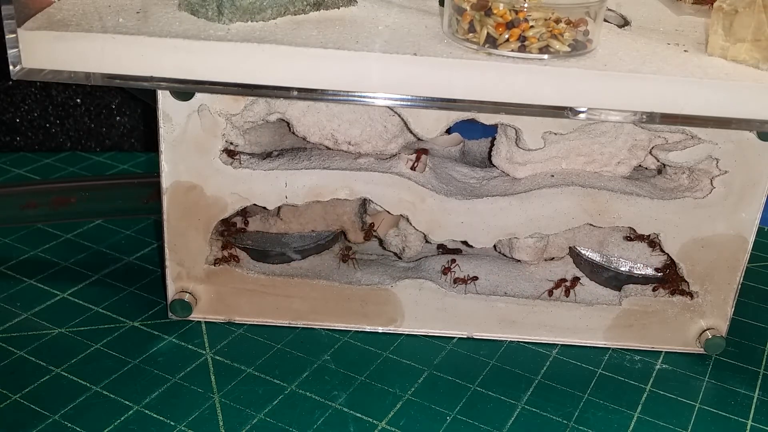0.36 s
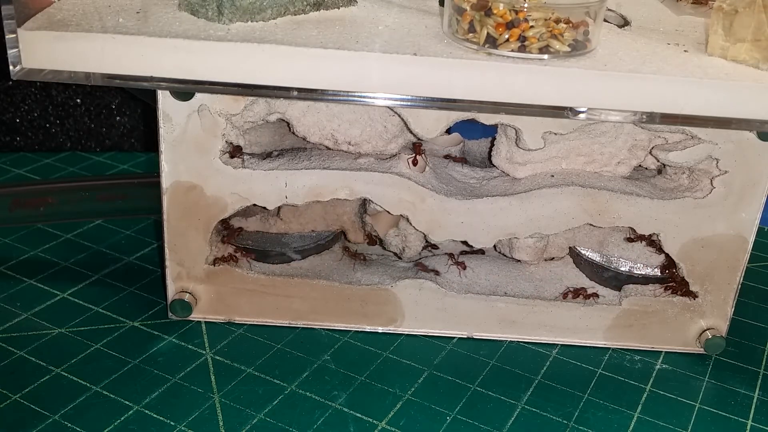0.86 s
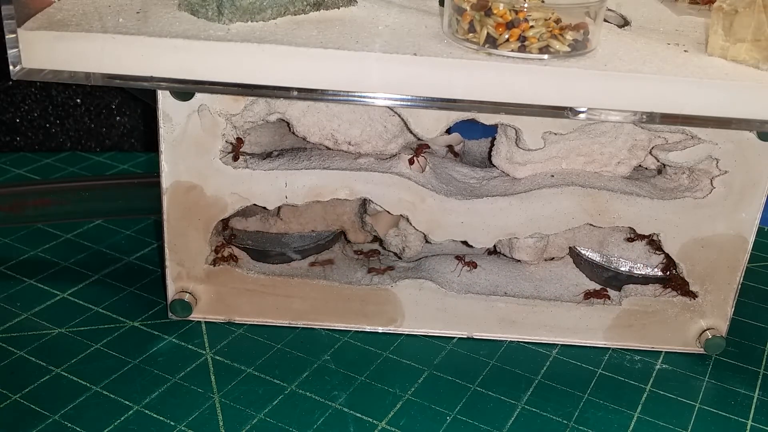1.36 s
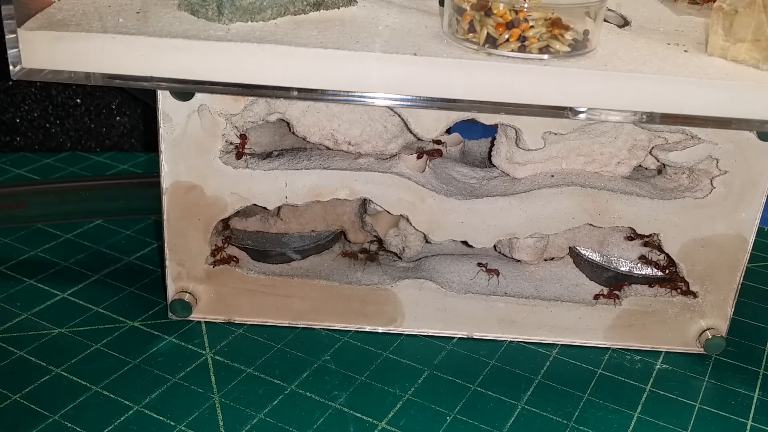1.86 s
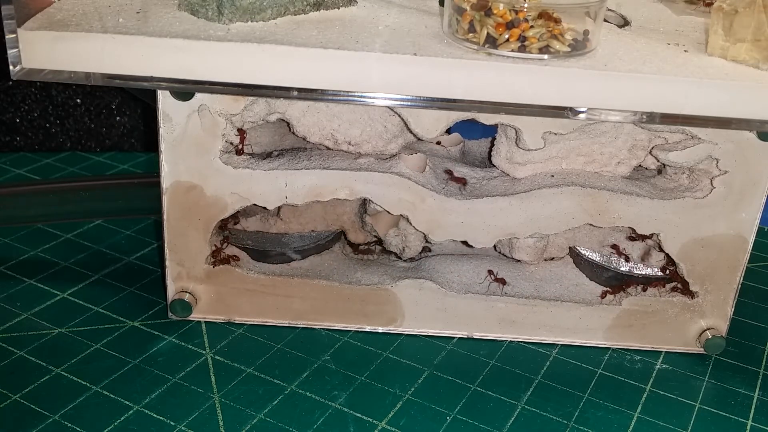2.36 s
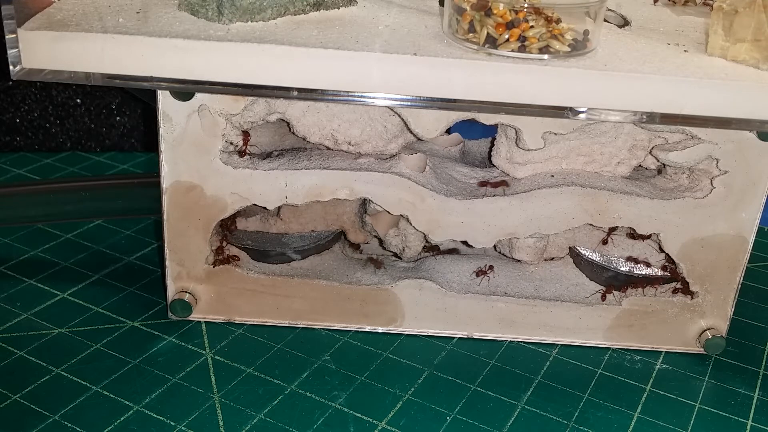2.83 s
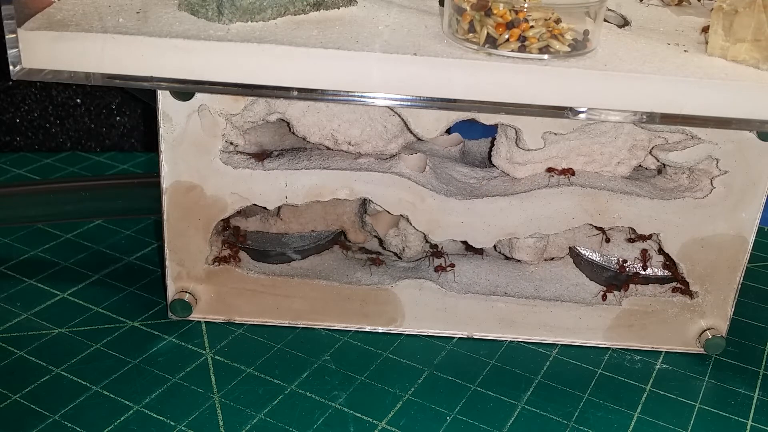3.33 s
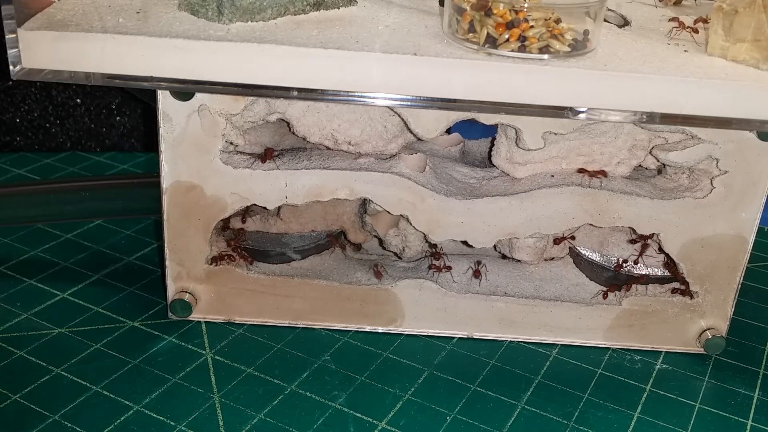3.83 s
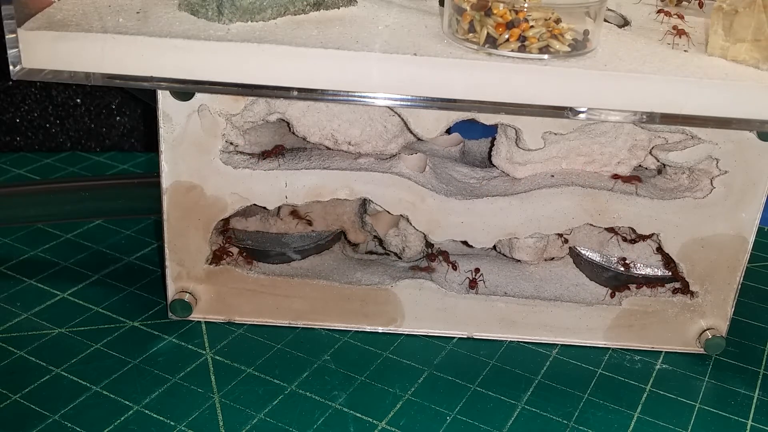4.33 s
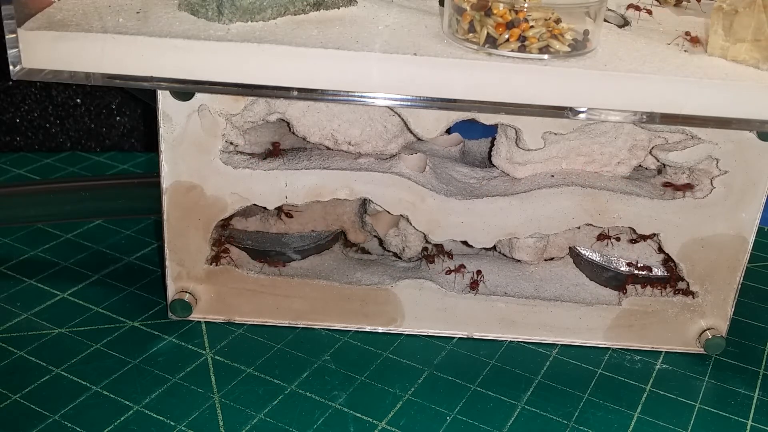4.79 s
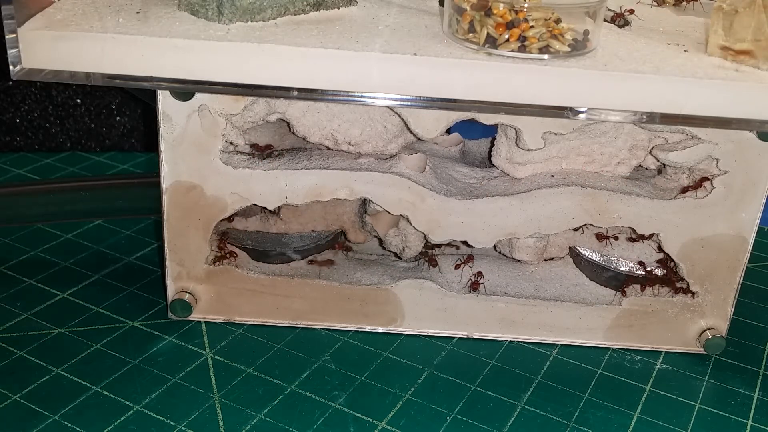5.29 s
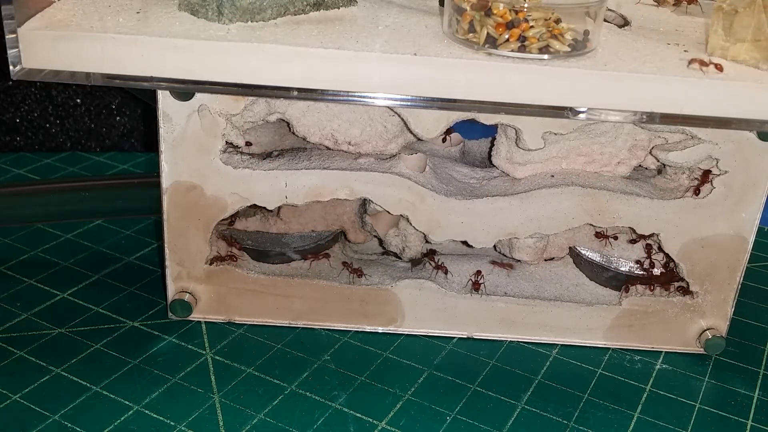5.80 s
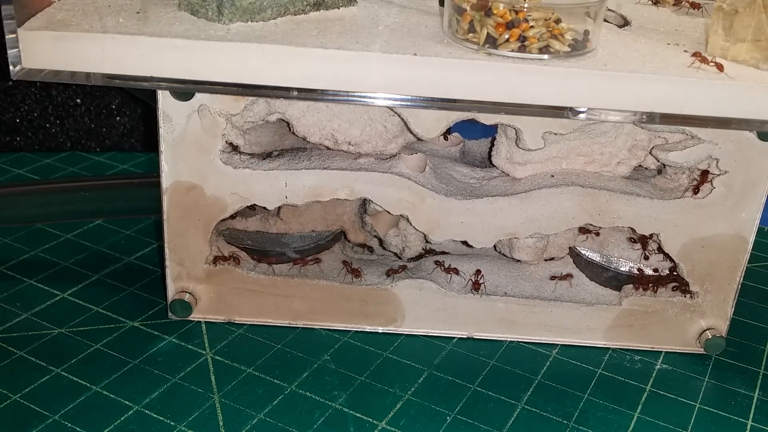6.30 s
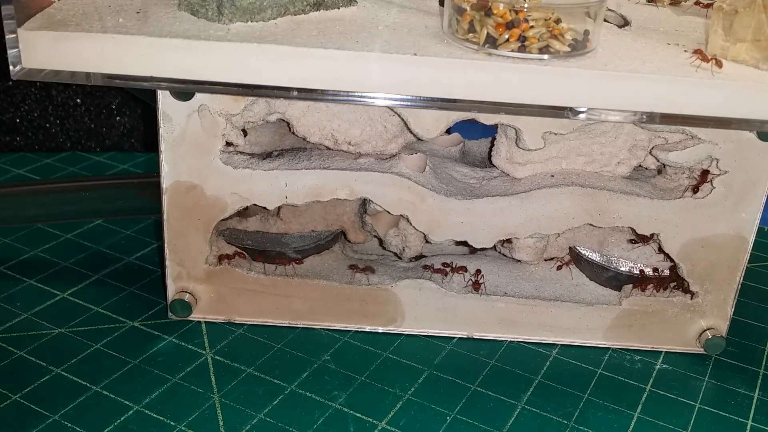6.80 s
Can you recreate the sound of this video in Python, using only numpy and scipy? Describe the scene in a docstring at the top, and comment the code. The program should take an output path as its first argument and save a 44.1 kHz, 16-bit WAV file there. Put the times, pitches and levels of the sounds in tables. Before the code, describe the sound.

A quiet indoor room, closely miked in stereo: a low wavering appliance hum, soft air rush, a thin motor whine and faint high hiss, with a very faint flickering high band on the left. Steel tweezers click at the very start, with tiny ticks and slides until about 0.7 s, nearer the right. After a gap, brighter short pings and scratches come at 1.75-1.9 s, 2.2-2.3 s and 2.5-3.0 s, the last cluster drier and tickier; sparse faint ticks continue to 3.85 s. Then mostly room tone, with one faint small knock on the right at 4.4 s. At 5.76 and 5.92 s two sharp taps strike the hollow lid, by far the loudest events, each with a hard crack, tiny rebound and short woody-metallic ring fading into the room within half a second. At 6.57 s a quick metallic click and scrape rattles briefly, then only the hum and hiss remain to about 7 s.

```python
"""A quiet room: steel tweezers scrape and click lightly on a small box nearer the right microphone, then tap its lid.
The prongs ring as damped sines with gated contact noise; the hollow lid rings in many modes after two taps.
One faint knock falls between. Contacts, taps and knock are echoed by decaying noise shaped like the room.
A far appliance hums as narrow noise and steady sines under rushing air.
Coloured noise hisses on both sides; apart from it, a faint band near 12.5 kHz on the left goes on and off."""
import sys
import numpy as np
from scipy import signal
from scipy.fft import rfft, irfft, next_fast_len
from scipy.io import wavfile
from scipy.ndimage import uniform_filter1d

SR = 44100
rng = np.random.default_rng(int(sys.argv[2]) if len(sys.argv) > 2 else 0)


def makeup_ratio(level_db):
    """Linear amplitude ratio for a level in decibels (20 dB per factor of ten)."""
    decades = np.asarray(level_db, float) / 20
    return 10 ** decades


def unload_wav(signal):
    """Save mono or channel-first audio to the path in sys.argv[1] as 16-bit WAV at rate SR, clipped to [-1, 1]."""
    wavfile.write(
        sys.argv[1],
        SR,
        np.round(np.clip(np.atleast_2d(signal).T, -1, 1) * 32767).astype(np.int16),
    )


N = 315315
TIME = np.arange(N) / SR


def unit(x):
    """Scale to rms 1."""
    return x / np.sqrt(np.mean(x ** 2))


def along(points, hz):
    """Read (freq_hz, value) points on a log frequency axis."""
    f, v = np.transpose(points)
    return np.interp(np.log(hz + 1), np.log(f + 1), v)


def noise(gain, channels=1):
    """White noise coloured by a gain per root Hz."""
    m = next_fast_len(N)
    white = rfft(rng.standard_normal((channels, m))) * np.sqrt(SR / 2)
    return irfft(white * gain(np.fft.rfftfreq(m, 1 / SR)), m)[:, :N]


def coloured(points):
    """Gain of a (freq_hz, level_db) table, silent beyond its top and under half its lowest frequency."""
    return lambda hz: makeup_ratio(along(points, hz)) * (hz > points[0][0] / 2) * (hz < points[-1][0])


def fade(t, t60):
    """Exponential decay, 60 dB in t60 seconds."""
    return makeup_ratio(-60 * t / t60)


def swell(t, rise, t60):
    """Exponential rise (time constant in s) then decay, peak 1."""
    shape = (1 - np.exp(-t / max(rise, 1 / SR))) * fade(t, t60)
    return shape / shape.max()


def add(out, s, piece):
    """Mix a piece in at time s, cut at the end."""
    room_left = out[..., round(s * SR):][..., :piece.shape[-1]]
    room_left += piece[..., :room_left.shape[-1]]


def sides(db):
    """Left and right gains for a left-right difference."""
    return makeup_ratio(np.array([[db / 2], [-db / 2]]))


# contact noise, left over right: freq_hz, left_right_db
CONTACT_BALANCE = [(1500, 0.5), (2800, 1.5), (4500, 0.5), (9000, -5), (14000, -4)]


def stereo_noise(points):
    """Unrelated contact noise in both microphones, rms 1 on the right."""
    def gain(hz):
        left_right = [makeup_ratio(along(CONTACT_BALANCE, hz)), 1 + 0 * hz]
        return coloured(points)(hz) * left_right

    pair = noise(gain, channels=2)
    return pair / pair[1].std()


# clear contacts, nominal levels on the right: start_s, ring_db, lower_ring_db, scratch_db, tick_db
CLICKS = [(0.008, -36, -54, -60, -60), (0.198, -54.5, -63, -74, -68), (0.262, -51, -59, -66, -69),
          (0.29, -59, -53, -68, -67), (0.309, -50, -52, -62, -66), (0.33, -55, -57, -65, -62),
          (0.589, -47, -46.5, -62, -66), (0.639, -54, -43, -74, -63), (0.714, -51, -60, -64, -65),
          (1.747, -33.5, -53, -49, -37), (1.851, -41, -62, -51, -42.5), (1.861, -46, -55, -50, -52),
          (1.878, -48, -60, -55, -51), (1.891, -39, -44, -49.5, -38), (2.199, -26, -37, -43.5, -48),
          (2.245, -51, -55, -66, -64), (2.306, -32, -45, -41.5, -39), (2.312, -37.5, -41, -49, -53),
          (2.515, -38.5, -44.5, -54, -53), (2.545, -48, -60, -58, -64), (2.58, -53, -64, -61, -68),
          (2.714, -49, -57, -73, -67), (2.745, -47, -51, -59, -51), (2.768, -30.5, -34, -45.5, -45),
          (2.774, -30, -37, -49, -44.5), (2.803, -54, -59, -55, -44), (2.824, -68, -63, -60, -51),
          (2.838, -50, -68, -57, -36.5), (2.853, -45, -57, -49.5, -36), (2.902, -43, -64, -49.5, -41.5),
          (2.963, -45, -60, -47, -32.5), (2.969, -49, -58, -55, -36), (2.978, -41, -67, -68, -48),
          (2.983, -58, -63, -49, -42), (3.285, -49, -58, -55.5, -43.5), (3.494, -51.5, -70, -62, -50),
          (3.735, -55, -63, -59, -50), (3.773, -56, -68, -54, -49), (3.831, -66, -70, -50.5, -38),
          (3.841, -66, -67, -55.5, -43), (6.572, -28, -27.5, -39.5, -33.5), (6.593, -50, -51, -50, -63),
          (6.603, -42, -43, -52, -58), (6.611, -36, -34.5, -41.5, -40), (6.62, -36, -47, -50, -39.5),
          (6.627, -40, -45, -52, -55)]
SNAGS_PER_S, SNAG_SPREAD_DB = 18, 2
# mean levels of chance snags: ring_db, lower_ring_db, scratch_db, tick_db
SNAG_DB = (-59.5, -63.5, -62.5, -67)


def contacts():
    """Clear contacts, each with the time of the next, then chance snags along every slide."""
    stops = [row[0] for row in CLICKS[1:]] + [np.inf]
    rows = [(*row, stop) for row, stop in zip(CLICKS, stops)]
    for s, length, _ in RUBS:
        place, size = rng.random(8), rng.standard_normal((8, 4))
        count = int(np.ceil(SNAGS_PER_S * length))
        for k in range(count):
            snag_s = s + length * (k + place[k]) / count
            levels_db = np.add(SNAG_DB, SNAG_SPREAD_DB * size[k])
            rows.append((snag_s, *levels_db, np.inf))
    return rows


# prong modes, t60 before damping: pitch_hz, level_re_ring_db, t60_s, left_right_db, left_lead_rad
PRONGS = [(1506, 0, 0.083, -9.5, 1.38), (1826, -15, 0.095, -1.5, 2.66), (2520, -20.5, 0.055, -4, 1.8)]
# box wall, driven by the dull scratch, capped 1 dB under the ring; same columns, level re that drive
WALL = [(648, -9, 0.42, 2.6, 1), (515, -10, 0.056, 2.6, .3)]
# relative colour of low scratch noise: freq_hz, level_db
DULL = [(1700, -33), (1900, -13), (2300, -8), (2700, 2.5), (3150, -3.5), (3600, -11.5), (4200, -34)]
# relative colour of higher scratch noise: freq_hz, level_db
SHARP = [(3100, -40), (3600, -9.5), (4200, -1), (4900, -4), (5800, -1.5), (6800, -34)]
# relative colour of the tick: freq_hz, level_db
TICK = [(5000, -34), (6200, 0), (7000, 10), (8800, 8.5), (10000, 7), (11500, 3.5), (15000, -3),
        (16500, -31)]
SHARPEN_DB_PER_DB = 0.086  # a contact that rings more than it ticks scratches sharper


def clicks():
    """Each contact rings prongs and wall, damped by grip and next touch, and gates scratches and a tick."""
    ring, gates, t = np.zeros((2, N)), np.zeros((3, N)), TIME[:SR // 5]
    rows = contacts()
    chance = rng.standard_normal((len(rows), 3))
    shapes = [swell(t, 0.00025, 0.05) + 0.99 * fade(t, 0.009),
              swell(t, 0.00098, 0.041) + 0.92 * fade(t, 0.0087),
              swell(t, 0.00012, 0.019) + 0.35 * fade(t, 0.095)]
    for (s, ring_db, lower_db, scratch_db, tick_db, stop), (pitch, grip, size) in zip(rows, chance):
        tilt_db = SHARPEN_DB_PER_DB * (ring_db - tick_db)
        dull, sharp = makeup_ratio(scratch_db - tilt_db), makeup_ratio(scratch_db + tilt_db)
        lower = (1310 + 55 * grip, lower_db - ring_db, .04, -7, 1.4)  # pitch depends on the grip
        next_touch = fade(np.maximum(t - (stop - s), 0), 0.029)
        damped = next_touch * np.exp(-(t / 0.019) ** 3)  # fingers close on the steel
        for hz, db, t60, side_db, lead in PRONGS + [lower] + WALL:
            drive = makeup_ratio(ring_db) if hz > 900 else min(dull, makeup_ratio(ring_db - 1))
            level = drive * makeup_ratio(db + side_db / 4 * size) * swell(t, 0.0019, t60) * damped
            swing = np.sin(2 * np.pi * hz * (1 + .008 * pitch) * t + [[lead], [0]])
            add(ring, s, level * makeup_ratio([[side_db], [0]]) * swing)
        peaks = np.array([[dull], [sharp], [makeup_ratio(tick_db)]])
        add(gates, s, makeup_ratio(-5.5) * peaks * shapes)
    slips = uniform_filter1d(rng.standard_normal(N), size=40)
    grit = unit(makeup_ratio(2.2 * unit(slips)))  # contact is a burst of tiny slips
    scratches = sum(gate * stereo_noise(colour) for gate, colour in zip(gates, (DULL, SHARP, TICK)))
    return ring + grit * scratches


# tips slide along the box; right level before end tapers: start_s, length_s, level_db_rms
RUBS = [(0.02, 0.097, -67), (.15, 0.21, -69), (.55, 0.12, -68), (1.848, 0.063, -54), (2.206, 0.06, -61),
        (2.305, 0.15, -64), (2.475, .12, -61), (2.74, 0.3, -66), (3.38, 0.19, -73), (3.73, 0.079, -66),
        (6.567, 0.082, -48)]
# relative colour of sliding: freq_hz, level_db
RUB = [(900, -19), (1150, 0), (1400, -17), (1530, 5.5), (1680, -9), (2000, -14), (3000, -15), (5000, -36),
       (9000, -24), (13000, -36), (15000, -60)]


def rubs():
    """Sliding keeps the prongs faintly and unevenly excited: noise peaked near their pitch."""
    gate = np.zeros(N)
    for s, length, db in RUBS:
        add(gate, s, makeup_ratio(db) * signal.windows.tukey(round(length * SR), .4))
    catches = makeup_ratio(4.0 * unit(uniform_filter1d(rng.standard_normal(N), size=500)))
    return gate * unit(catches) * stereo_noise(RUB)


# taps, rebound level re crack: start_s, crack_db, crack_t60_s, rebound_db
TAPS = [(5.7595, -19, 0.025, -6.5), (5.9232, -16.5, 0.03, -9)]
# lid modes, level before rise and decay: pitch_hz, t60_s, first_spot_db, second_spot_db, left_right_db
LID = [(113, .9, -46, -40, 3), (143, .42, -38, -29, 1), (286.6, .7, -45, -35, 4), (359, .25, -25, -35, -5),
       (465, .3, -29, -19, 0), (476, .25, -25, -14.5, 2), (520, .42, -33, -22, 4), (564.5, .3, -24, -13, 0),
       (617, .26, -34, -25, 5), (679.5, .25, -27, -18, 3), (727, .27, -40, -30, 4), (195, .1, -36, -30, 1),
       (320, .1, -38, -34, 0), (410, .1, -34, -28, 0), (853, .1, -45, -36, 6), (1150, .3, -38, -35, -4),
       (1360, .11, -38, -29, -6), (1428, .08, -34, -37, 8), (1545, .09, -44, -37, -5),
       (1755, .09, -44, -32, -8), (1965, .1, -34, -27, 6), (2150, .1, -42, -31, -5),
       (2396, .1, -44, -34, 6), (2612, .16, -43, -33, -4), (3213, .18, -47, -33, 2),
       (3850, .08, -40, -36, -5), (5010, .08, -45, -40, 7)]
# relative colour of the crack: freq_hz, level_db
CRACK = [(150, -21), (300, 9.5), (700, 9.5), (1000, 1.5), (1500, 4), (3000, 3), (5000, 1.5), (7000, 0.5),
         (10000, -12), (16000, -21.5)]
PHASE_OFFSET_S = 0.002355  # sets each mode's starting phase, which grows with its pitch
RISE_AT_500_HZ_S, REBOUND_S, RATTLE_DB = 0.0055, 0.0061, -30.5
LINGER_DB, LINGER_T60_S = -17, 0.27  # high modes fall fast at first, then ring on faintly


def taps():
    """Each tap rings the lid's long low modes and short high ones, cracks, rebounds once and rattles."""
    body, edge, gate, t = np.zeros((2, N)), np.zeros((2, N)), np.zeros(N), TIME[:SR]
    for spot, (s, crack_db, crack_t60, rebound_db) in enumerate(TAPS):
        for hz, t60, *level_db, side_db in LID:
            # high modes reach each ear differently
            apart_rad = rng.standard_normal((2, 1)) * np.clip(hz / 900 - .45, 0, 3)
            swing = np.sin(2 * np.pi * hz * (t + PHASE_OFFSET_S) + apart_rad)
            attack = 1 - np.exp(-t / RISE_AT_500_HZ_S * np.sqrt(hz / 500))
            dying = fade(t, t60) + (hz > 800) * makeup_ratio(LINGER_DB) * fade(t, LINGER_T60_S)
            mode = makeup_ratio(level_db[spot]) * sides(side_db) * attack * dying * swing
            add(body if hz < 800 else edge, s, mode)
        crack = makeup_ratio(crack_db) * swell(t, 0.00064, crack_t60)
        rattle = makeup_ratio(RATTLE_DB) * fade(t, 0.043)
        add(gate, s, crack + rattle)
        add(gate, s + REBOUND_S, makeup_ratio(crack_db + rebound_db) * swell(t, 0.0016, crack_t60))
    return body, edge + gate * unit(noise(coloured(CRACK), channels=2))


SHIMMER_COUNT, SHIMMER_DB_PER_OCT = 60, -2.5
SHIMMER_RE_CRACK_DB, SHIMMER_T60_S = -25.5, 0.29  # both at 1 kHz


def shimmer():
    """The lid's many weak high modes: the same pitches for every tap, new strengths each time."""
    out, t = np.zeros((2, N)), TIME[:SR // 2]
    octave = 2.7 * rng.random((SHIMMER_COUNT, 1))
    decay = fade(t, SHIMMER_T60_S / (1 + 0.49 * octave))
    for s, crack_db, *_ in TAPS:
        for ear in out:
            size, phase = rng.standard_normal((SHIMMER_COUNT, 1)), rng.random((SHIMMER_COUNT, 1))
            swing = np.sin(2 * np.pi * (1000 * 2 ** octave * t + phase))
            modes = makeup_ratio(SHIMMER_DB_PER_OCT * octave + 4.5 * size) * swing * decay
            add(ear, s, makeup_ratio(crack_db + SHIMMER_RE_CRACK_DB) * modes.sum(axis=0))
    return out


KNOCK_S = 4.407
# modes of one faint knock, level midway between sides: pitch_hz, level_db, t60_s
KNOCK = [(958, -53, .055), (1793, -56, .035), (420, -58, .03)]


def knock():
    """Something small knocks once, to the right: a few short damped modes."""
    out, t = np.zeros((2, N)), TIME[:SR // 5]
    for hz, db, t60 in KNOCK:
        add(out, KNOCK_S, makeup_ratio(db) * sides(-12) * swell(t, 0.0011, t60) * np.sin(2 * np.pi * hz * t))
    return out


# reverberation: freq_hz, t60_s
ROOM = [(300, 0.54), (1500, 0.59), (4000, 0.45), (8000, 0.26), (14000, 0.4)]


def room(x):
    """Each frequency of the room's answer dies at its own speed."""
    hz, t, z = signal.stft(rng.standard_normal((2, SR // 2)), SR, nperseg=256)
    decaying = z * fade(t, along(ROOM, hz)[:, None])
    tail = signal.istft(decaying, SR, nperseg=256)[1]
    return signal.fftconvolve(x, tail / np.linalg.norm(tail[0]), axes=1)[:, :N]


# left hiss colour, rescaled to HISS_DB: freq_hz, relative_db_per_hz
HISS_LEFT = [(1000, -112), (2500, -103), (4500, -101), (5500, -95), (6100, -85.5), (6600, -84), (7100, -91),
             (7900, -101), (9500, -104), (10900, -107), (13600, -104), (14500, -99.5), (15300, -95.5),
             (15600, -140)]
# right hiss: freq_hz, level_db_per_hz
HISS_RIGHT = [(800, -108), (2500, -105), (4500, -107), (6200, -111), (10000, -109), (15300, -106),
              (15600, -140)]
# faint on-off band on the left, on the scale of HISS_LEFT: freq_hz, relative_db_per_hz
FLICKER = [(10900, -115), (11500, -102), (12200, -94), (12800, -99.5), (13200, -88.5), (13600, -115)]
# spells with the on-off band almost silent: start_s, length_s
GAPS = [(0.094, 0.062), (0.232, 0.094), (0.531, 0.059), (0.646, 0.072), (1.089, 0.073), (1.376, 0.11),
        (2.432, 0.15), (2.703, 0.06), (3.052, 0.076), (3.186, 0.039), (3.367, 0.12), (3.743, 0.083),
        (4.276, 0.13), (4.442, 0.041), (4.719, 0.11), (5.168, 0.091), (5.368, 0.16), (5.95, 0.063),
        (6.13, 0.063), (6.285, 0.085), (6.973, 0.093)]
BLINKS_PER_S, BLINK_S = 2, .02  # short spells at chance times
HISS_DB, SURGE_DB, SURGE_S = -52.5, 4.5, 0.22  # left hiss rms; jump at each tap, time constant back


def hiss_and_flicker():
    """Hiss on both sides, plus a faint left band near 12.5 kHz going on and off; the left jumps at each tap."""
    present, surge_db = np.ones(N), np.zeros(N)
    blinks = [(s, BLINK_S) for s in rng.random(round(BLINKS_PER_S * N / SR)) * N / SR]
    for start, length in GAPS + blinks:
        present[(TIME > start) & (TIME < start + length)] = .05
    for s, *_ in TAPS:
        add(surge_db, s, SURGE_DB * np.exp(-TIME[:SR] / SURGE_S))
    flicker = uniform_filter1d(present, size=400) * noise(coloured(FLICKER))[0]
    steady = noise(coloured(HISS_LEFT))[0]
    left = (steady + flicker) / steady.std() * makeup_ratio(HISS_DB + surge_db)
    return np.array([left, noise(coloured(HISS_RIGHT))[0]])


# air rush: freq_hz, level_db_per_hz
AIR = [(30, -108), (45, -104), (60, -77), (160, -86), (210, -90.5), (300, -87), (520, -89.5), (620, -94.5),
       (1000, -99), (2000, -106), (5000, -118)]
# left-right correlation of the air: freq_hz, likeness
ALIKE = [(60, 1), (150, 0.76), (230, 0.81), (500, 0.76), (780, -0.55), (1200, 0.15), (1800, -0.33)]
# wavering room tones, rescaled by SWELL: pitch_hz, width_hz, relative_db_per_hz
BOOM = [(57.6, 11.4, -82.5), (81.9, 5.6, -73), (120.15, 2.56, -67), (124.74, 1.24, -64), (133.5, 13, -77.5),
        (141.9, 5.4, -73.5), (255.7, 6, -79), (390, 9.2, -86), (427, 3.7, -99.5), (532.8, 6.9, -84),
        (650, 2.2, -89.5)]
# room tone level, midway between sides: time_s, level_db_rms
SWELL = [(0, -54), (1.2, -56.5), (2.4, -54), (3, -57.5), (4.1, -51.5), (4.5, -52.5), (5.3, -56.5),
         (6, -54.5), (6.6, -57), (7.15, -54)]
# steady whine, level midway between sides: pitch_hz, level_db_rms, left_right_db
WHINE = [(763, -91, 25), (884, -99, -37), (965, -108.5, -28), (1068, -76.5, 0), (1180, -82, -3),
         (1690, -88.5, -16)]


def background():
    """Air rush, low room tones of narrow noise and a thin motor whine; the air's bass is alike in both ears."""
    def air_gain(hz):
        turn = np.arccos(np.clip(along(ALIKE, hz), -1, 1)) / 2
        return coloured(AIR)(hz) * [np.cos(turn), np.sin(turn)]

    def tone_gain(f):
        return np.sqrt(sum(makeup_ratio(db) ** 2 / (1 + (2 * (f - hz) / w) ** 4) for hz, w, db in BOOM))

    mid, side = noise(air_gain, channels=2)
    air = np.array([mid + side, mid - side])
    s, boom_db = np.transpose(SWELL)
    tones = unit(noise(tone_gain)) * makeup_ratio(np.interp(TIME, s, boom_db)) * sides(-0.85)
    whine = np.zeros((2, N))
    for hz, db, side_db in WHINE:
        swing = np.sin(2 * np.pi * (hz * TIME + rng.random()))
        whine += np.sqrt(2) * makeup_ratio(db) * sides(side_db) * swing
    return air + tones + whine


def scene():
    """Contacts, taps and knock, direct and through the room, over background and hiss."""
    ring, crack = taps()
    light = clicks() + knock() + rubs()
    sent = makeup_ratio(-11.5) * crack + makeup_ratio(-17.5) * ring + makeup_ratio(-21) * light  # light contacts barely wake the room
    return ring + crack + shimmer() + light + room(sent) + background() + hiss_and_flicker()


def band_limit(x):
    """A steep low-pass at the top of the band."""
    return signal.sosfilt(signal.butter(12, 16820, fs=SR, output="sos"), x)


def record(dry):
    """The microphones lose the deepest bass and add a small offset."""
    steep = signal.butter(3, 45, "highpass", fs=SR, output="sos")
    mix = signal.sosfilt(steep, dry) - .0004
    return band_limit(mix)


dry = scene()
out = record(dry)
unload_wav(out)
```